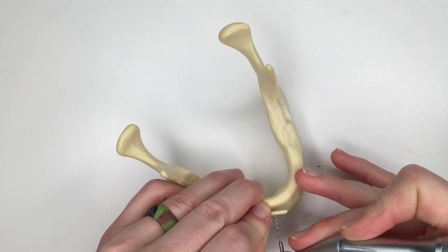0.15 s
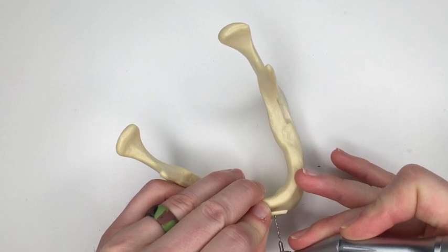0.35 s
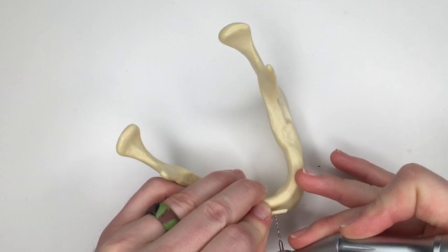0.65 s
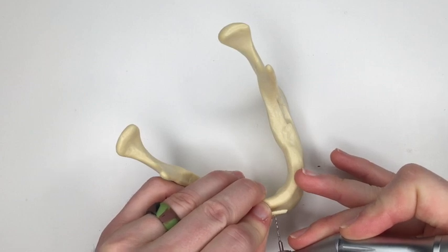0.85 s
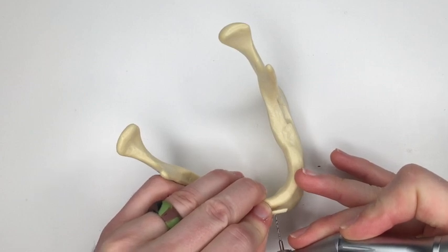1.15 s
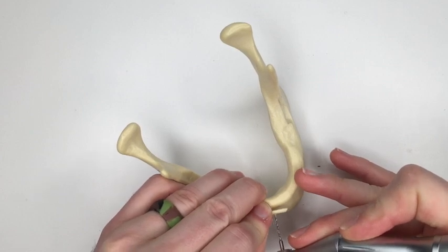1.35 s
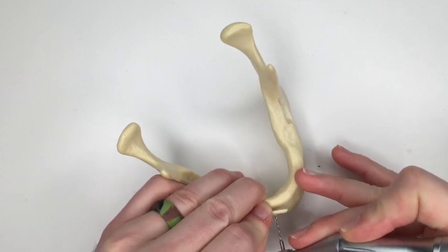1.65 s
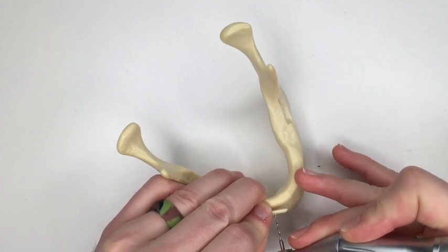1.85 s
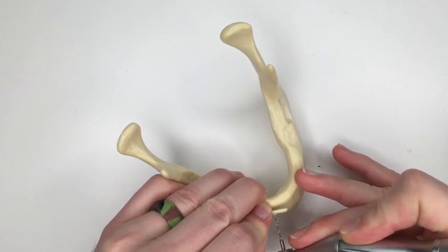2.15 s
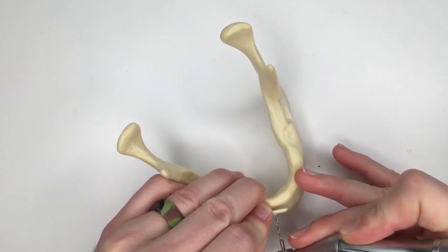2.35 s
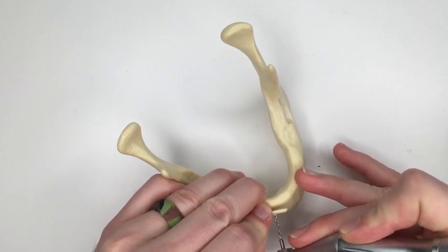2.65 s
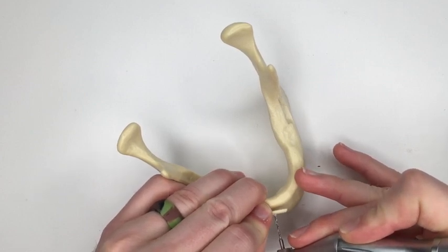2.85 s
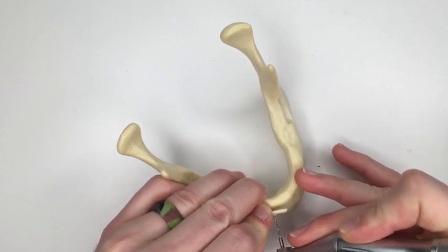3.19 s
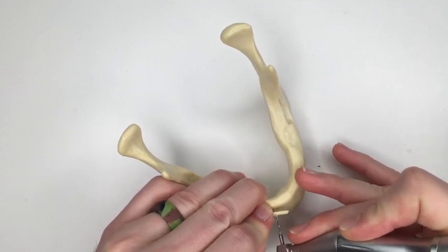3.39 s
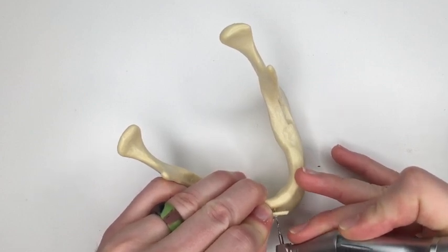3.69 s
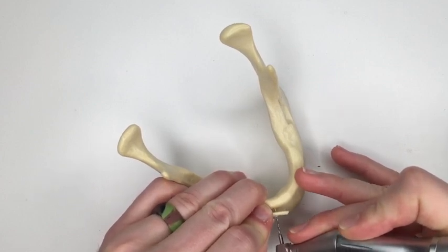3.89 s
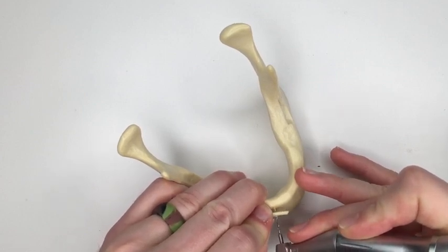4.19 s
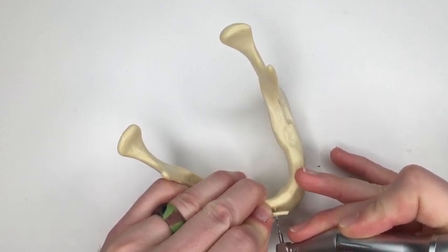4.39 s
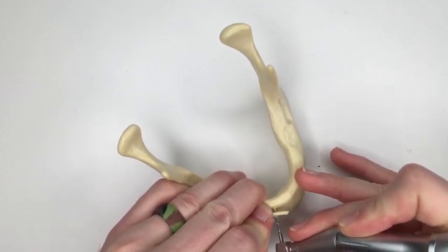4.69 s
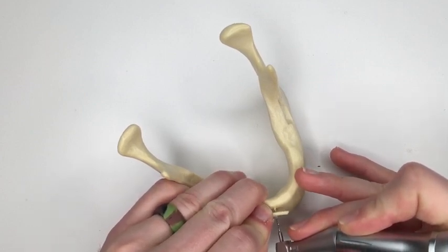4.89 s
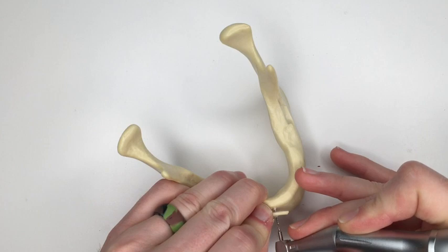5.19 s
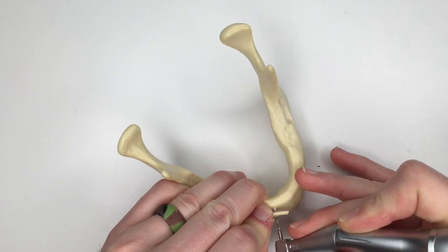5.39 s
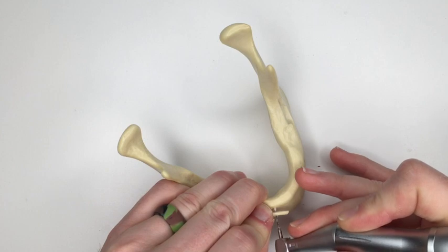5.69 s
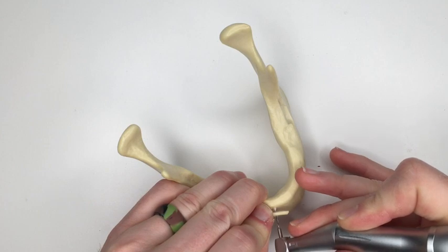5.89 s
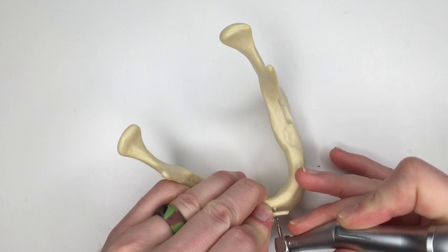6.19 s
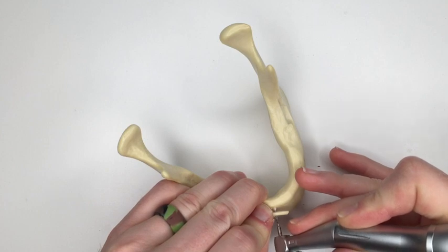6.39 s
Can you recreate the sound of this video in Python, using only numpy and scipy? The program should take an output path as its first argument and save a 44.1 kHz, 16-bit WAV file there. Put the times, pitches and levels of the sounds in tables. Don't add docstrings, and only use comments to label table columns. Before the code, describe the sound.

A faint room hum, then almost at once loose gear knocks and a fast rising whir. The drill briefly overspeeds, drops back, then climbs again with a bright, hissy steel rattle and rough pulsing. A thin plate buzzes as it is cut through; afterwards the tone smooths, with clearer high whine and a slight hollow plastic resonance. Dry, close, mono sound, still running at the cut-off.

```python
import sys
import numpy as np
from scipy import signal
from scipy.fft import rfft, irfft
from scipy.io import wavfile
from scipy.ndimage import uniform_filter1d

SR = 44100
rng = np.random.default_rng(int(sys.argv[2]) if len(sys.argv) > 2 else 0)


def dump(signal):
    limited = np.clip(np.atleast_2d(signal).T, -1, 1)
    pcm = np.round(limited * 32767).astype(np.int16)
    wavfile.write(sys.argv[1], SR, pcm)


def boost_factor(decibels):
    exponent = np.asarray(decibels, float) / 20
    return 10 ** exponent


N = 288414
T = np.arange(N) / SR
COARSE = T[::32]

# (frequency [Hz], level [dB per Hz])
HISS = [(180, -18), (300, -22), (354, -58), (500, 5), (590, -14.5), (922, -12), (1370, -5.5), (15500, -13)]
HISS_DB, RUMBLE_DB, TABLE_DB = -76.5, -77.5, -77.5
# (time [s], gain [dB], width [s])
DRONES = [
    (1.35, 3.5, 0.35),
    (2.3, 3, 0.29),
    (3.9, 1, 0.46),
]
# (time [s], gain [dB], width [s])
SHIFTS = [
    (2.3, 5.5, .25),
    (4.7, 3, .15),
    (5.5, 5, 0.21),
    (6.2, 6, 0.25),
]
# (time [s], peak level [dB], frequency [Hz])
BUMPS = [
    (3.357, -56, 406),
]

# (time [s], motor turns [Hz])
PEDAL = [(.055, 39.66), (.162, 118.7), (.282, 186.6), (.678, 194), (.86, 201.3), (.973, 212.5),
         (1.157, 217.8), (1.546, 222.8), (1.733, 228.4), (1.984, 221), (2.18, 226.4), (2.385, 237.3),
         (2.738, 246), (3.093, 253), (4.577, 256.5), (4.647, 259.5), (6.54, 258.9)]
# (time [s], gain [Hz], settling time [s])
PUSH = (1.543, 43, .095)
# (time [s], gain [Hz], width [s])
SURGES = [
    (.418, 59.5, .088),
    (1.31, -0.84, 0.053),
    (2.598, 9.5, 0.086),
    (3.26, 2, 0.14),
    (4.08, 1, .09),
    (5.048, 3.5, 0.096),
]
FULL_HZ = 300
# (time [s], depth [0-1])
DEPTH = [
    (3.3, 0.01),
    (3.6, .1),
    (4.3, 0.41),
    (4.7, .85),
    (4.92, 0.78),
    (5.08, 0.51),
    (5.3, 1.02),
    (6.54, 1.02),
]
TOUCH_S = [
    3.42,
    3.65,
]

# (time [s], rattle level [dB])
RATTLE = [(.052, -75), (.09, -60), (.22, -53), (.42, -48), (.58, -50), (1.0, -48.5), (1.4, -46.5),
          (1.98, -43), (2.36, -43), (2.66, -44.5), (2.94, -45), (3.1, -48), (3.73, -44.5), (4.3, -48),
          (4.65, -51.5), (4.95, -50), (5.9, -51), (6.54, -50)]
USUAL_DB = -47
# (time [s], level over the rattle [dB], length [s])
TAKE_UP = [
    (.054, 1, .006),
    (.061, 1, .001),
    (.0715, 5, .003),
    (.092, 0, .004),
    (.119, 0, .003),
    (.126, 0, .004),
    (.184, -2, .004),
    (.222, -2, .002),
    (.247, -1, .002),
]
FIRST_BITE_S = .0575
# (time [s], frequency [Hz], level [dB])
PULL_IN = [
    (.05, 2260, -51),
    (.12, 2150, -53.5),
    (.19, 2150, -50.5),
    (.25, 2500, -47),
    (.3, 3050, -50),
    (.34, 3440, -55),
    (.4, 3650, -86),
]
CARRIER_RATIO, BUR_RATIO, STAGE_RATIO = 1 / 4, 3 / 22, 12 / 11
# (swells per planet-carrier turn, height [dB])
CARRIER = [(1, 1.4), (2, -2.5), (3, 1.5), (5, 2.5), (6, 5.5)]
# (swells per bur turn, height [dB])
BUR = [(1, 2.1), (2, 0.27), (3, 0.15), (4, 0.72)]
LOOSE_BACKLASH, BACKLASH = 0.46, 0.88
REPEAT, DEEP_REPEAT = 0.31, 0.25

# (level in the plate [dB], gain deep in the jaw [dB])
ORDERS = [(-95, 7.5), (-96, 4.5), (-84.5, 12), (-78.5, 11), (-77, 4), (-81.5, -1.5), (-78, 0.5), (-76, 5.5),
          (-76.5, -2), (-77, 4), (-82, -7), (-77.5, 7), (-75.5, -2), (-75, -0.5), (-70.5, -1.5), (-76, -2),
          (-72.5, 1), (-73.5, 0.5), (-79, 9.5), (-86, 3), (-105, 2), (-80, -23), (-73, -14), (-78.5, 12),
          (-77, 9), (-71, 9.5), (-65, 3.5), (-77, 6)]
WHINE_DB_PER_OCTAVE = 16
# (multiple of its turns, level [dB])
STAGE = [(2, -91.5), (3, -91.5), (5, -91), (7, -87.5), (9, -81.5), (10, -83)]
# (multiple of motor turns, level [dB])
TOP_ORDERS = [(26.75, -69), (33, -67), (36, -67), (39.25, -68), (43.75, -66), (44, -63), (44.25, -64)]
# (frequency [Hz], half width [Hz], lift [dB])
BODY = [(540, 219, 14), (1175, 80, 2), (2133, 114, 10), (2930, 300, 9), (3635, 166, 6.5), (3910, 60, 7),
        (4765, 110, 7.5), (5560, 194, 11), (7773, 280, 6)]
# (time [s], gain [dB], width [s])
RUN_FREE = [
    (.43, 3.5, 0.087),
]

# (frequency [Hz], width [Hz], level [dB])
BARREL = [(9755, 780, -2.5), (10610, 740, 0), (11320, 390, -9)]
# (frequency [Hz], width [Hz], level [dB])
CAP = [(11420, 200, -10), (11740, 160, 2.5), (12120, 130, -2.5)]
# (frequency [Hz], width [Hz], level [dB])
NECK = [(12100, 170, -11), (13150, 380, -5.5), (13620, 350, -2), (13760, 1400, -7.5), (15800, 900, -12)]
# (frequency [Hz], width [Hz], level [dB])
SHELL = [(6450, 230, -5), (7000, 370, 2.5), (7510, 460, 4.5), (8170, 450, 4), (8460, 230, 3)]
# (frequency [Hz], width [Hz], level [dB])
BETWEEN = [(5050, 530, -12.5), (9020, 420, -7), (11930, 150, -6), (12700, 380, 2), (14450, 600, -4)]
BETWEEN_DB = -2
# (frequency [Hz], width [Hz], level [dB])
PLATE = [(2150, 320, -8.5), (2657, 420, -10), (3030, 610, -1), (3723, 460, 0.5)]
# (frequency [Hz], width [Hz], level [dB])
FLUTES = [(4343, 870, -1), (4920, 640, -5.5), (5390, 320, -4), (6126, 620, 1.5)]
# (frequency [Hz], width [Hz], level [dB])
JAW = [(484, 180, -6), (1050, 307, 2.5), (1306, 103, -4), (1707.5, 690, 6.5)]
# (level at usual rattle and full speed [dB], share of the rattle's swings [0-1],
# slope [dB per octave of speed], gain on touching the jaw [dB], gain at full depth [dB])
PARTS = [
    (-47, 0.92, 3, 1, -0.5),
    (-53, 0.71, -3, 1.5, -5.5),
    (-51, 0.99, -1, -0.5, 5.5),
    (-53, 0.77, 0, 0, 2.5),
    (-65, 0.41, -3, 2.5, 3.5),
    (-59.5, 0.53, -1.5, .5, 1.5),
    (-75, 0.24, 0.5, 5.5, 2.5),
]
# (time [s], gain [dB], width [s])
CHATTER = [
    (2.75, 13.5, 0.23),
    (3.6, 13, 0.19),
    (4.1, 7.3, 0.14),
]
# (frequency [Hz], width [Hz], level [dB])
CHATTER_NOTE = [(5365, 110, -4), (5830, 250, -0.5)]
CHATTER_DB = -71


def unit(x):
    return x / np.sqrt(np.mean(x ** 2))


def curves(table):
    s, *columns = np.transpose(table)
    return [np.interp(T, s, c) for c in columns]


def swells(rows):
    return sum(height * np.exp(-.5 * ((T - s) / width) ** 2) for s, height, width in rows)


def fine(slow):
    return np.interp(T, COARSE, slow)


def drift(rate):
    k = max(int(SR / 32 / rate), 1)
    held = np.repeat(rng.standard_normal(len(COARSE) // k + 1), k)[:len(COARSE)]
    return 1.3 * uniform_filter1d(uniform_filter1d(held, k), k)


def walk(rate):
    return fine(drift(rate))


def ring(x, modes, wander_db=0.):
    out = 0
    for k, (hz, width, db) in enumerate(modes):
        b, a = signal.iirpeak(hz, hz / (1.46 * width), SR)
        gain = fine(boost_factor(db + wander_db * (drift(2.12) + drift(9)))) / np.sqrt(width)
        rung = signal.lfilter(b, a, signal.lfilter(b, a, x))
        out = out + (-1) ** k * gain * rung
    return unit(out)


def hiss():
    f = np.fft.rfftfreq(N, 1 / SR) + 1
    hz, db = np.transpose(HISS)
    tilt = boost_factor(np.interp(np.log(f), np.log(hz), db))
    return boost_factor(HISS_DB) * unit(irfft(rfft(rng.standard_normal(N)) * tilt, N))


def bumps():
    out = 0
    for s, db, hz in BUMPS:
        age = np.maximum(T - s, 0)
        out = out + boost_factor(db) * np.exp(-age / 0.0021) * np.sin(2 * np.pi * hz * age)
    return out


def room():
    rumble = ring(rng.standard_normal(N), [(29.3, 22, -2.3), (57, 13.8, 0.69), (65.2, 17.0, -0.27)])
    table = ring(rng.standard_normal(N),
                 [(105.8, 21.4, -3.0), (200.3, 133, 0.5), (349, 43, -2.0), (556, 310, -2.5)])
    out = boost_factor(RUMBLE_DB + swells(DRONES)) * rumble
    out = out + boost_factor(TABLE_DB + swells(SHIFTS)) * table
    return out + hiss() + bumps()


def speed():
    s, gain_hz, settle = PUSH
    push = gain_hz * (1 - np.exp(-np.maximum(T - s, 0) / settle))
    return curves(PEDAL)[0] + push + swells(SURGES)


def pull_in(turn, age):
    ring_hz, db = curves(PULL_IN)
    pitch, level = rng.standard_normal((turn[-1] + 1, 2))[turn].T
    envelope = (1 - np.exp(-age / .0003)) * np.exp(-age / .001)
    bite = envelope * np.sin(2 * np.pi * ring_hz * (1 + .04 * pitch) * age)
    return boost_factor(db + 1.7 * level) * bite


def whine(turns, hz, depth):
    out = 0
    hz, depth, free_db = hz[::32], depth[::32], swells(RUN_FREE)[::32]
    loose = np.interp(COARSE, [4, 5.3], [1, .4])
    shaft = turns + fine(.0045 * loose * drift(70))

    def tone(k, gain):
        return fine(gain) * np.sin(2 * np.pi * (k * shaft + rng.random()))

    speed_db = WHINE_DB_PER_OCTAVE * np.log2(hz / FULL_HZ)
    for k, (db, deep_db) in enumerate(ORDERS, start=1):
        db = db + speed_db + deep_db * depth
        db = db + free_db * (6 < k < 16)
        db = db + sum(lift / (1 + ((k * hz - f) / w) ** 2) for f, w, lift in BODY)
        flutter_db = loose * (1 + k / 20) * drift(14)
        out = out + tone(k, boost_factor(db + flutter_db))
    loaded = np.interp(hz, [270, 298], [.2, 1])
    for k, db in STAGE:
        out = out + tone(k * STAGE_RATIO, loaded * boost_factor(db + 11.6 * depth))
    for k, db in TOP_ORDERS:
        out = out + tone(k, loaded ** 2 * boost_factor(db + 1.6 * drift(6.6)))
    engaged_db = np.interp(T, [.26, .4], [-22, -1])
    return np.sqrt(2) * boost_factor(engaged_db) * out


def worn(turns, count):
    wear = rng.standard_normal(count)
    return unit(np.interp(turns % 1 * count, np.arange(count + 1), np.append(wear, wear[0])))


def teeth(turns, backlash, repeat):
    share = np.clip(repeat, 0, .95)
    same = worn(turns * CARRIER_RATIO, count=800)
    hits = np.sqrt(share) * same + np.sqrt(1 - share) * rng.standard_normal(N)
    swell = 0.77 * walk(300) + 0.41 * walk(35) + 0.13 * walk(8.6)
    seated = np.interp(T, [2.6, 4.6], [1, .45])
    for ratio, spots in ((CARRIER_RATIO, CARRIER), (BUR_RATIO, BUR)):
        for k, db in spots:
            height = db * seated * (1 + 0.14 * walk(4.9))
            swell = swell + height * np.cos(2 * np.pi * (k * ratio * turns + rng.random()))
    gate = boost_factor(7.4 * np.tanh(np.clip(backlash, 0, 2) * swell / 6))
    return hits * gate / np.sqrt(uniform_filter1d(gate ** 2, SR // 4))


def slack(age):
    tight = np.interp(T, [.11, .3], [.25, 1])
    gain = tight + 1.3 * (1 - tight) * np.exp(-age / 0.0052)
    for s, db, length in TAKE_UP:
        gain = gain + boost_factor(db) * np.exp(-np.abs(T - s) / length) * (T > s)
    return gain


def levels(hz, depth):
    swing_db = curves(RATTLE)[0] - USUAL_DB
    octaves = np.log2(np.maximum(hz, 190) / FULL_HZ)
    touch = np.interp(T, TOUCH_S, [0, 1])
    silent_db = np.minimum(swing_db + 11, 0)
    return [db + share * (swing_db - silent_db) + silent_db + slope * octaves + on_touch * touch + deep * depth
            for db, share, slope, on_touch, deep in PARTS]


def housing(hits, elsewhere, turns, hz, part_db):
    barrel_db, cap_db, neck_db, shell_db = part_db
    bright = hits + boost_factor(-8) * worn(turns, count=200)
    out = boost_factor(barrel_db) * ring(bright, BARREL, wander_db=1.0)
    out = out + boost_factor(cap_db) * ring(bright, CAP, wander_db=0.4)
    out = out - boost_factor(neck_db) * ring(bright, NECK, wander_db=0.3)
    out = out - boost_factor(shell_db) * ring(hits, SHELL, wander_db=-0.77)
    between_db = neck_db + BETWEEN_DB - 5 * np.log2(hz / FULL_HZ)
    out = out + boost_factor(between_db) * ring(elsewhere, BETWEEN, wander_db=0.8)
    chatter = boost_factor(CHATTER_DB + swells(CHATTER)) * (T > .3)
    return out + chatter * ring(bright, CHATTER_NOTE, wander_db=1.5)


def cut(hits, elsewhere, part_db):
    plate_db, flutes_db, jaw_db = part_db
    out = boost_factor(plate_db) * ring(hits, PLATE, wander_db=0.3)
    out = out + boost_factor(flutes_db) * ring(hits, FLUTES, wander_db=0.3)
    out = out + boost_factor(jaw_db) * ring(elsewhere, JAW, wander_db=0.3)
    return boost_factor(np.interp(T, [.2, .35], [-4, 0])) * out


def handpiece():
    hz, depth = speed(), curves(DEPTH)[0]
    part_db = levels(hz, depth)
    turns = np.cumsum(hz * (T > FIRST_BITE_S)) / SR
    age = turns % 1 / hz
    backlash = np.interp(T, [.22, .4], [LOOSE_BACKLASH, BACKLASH])
    repeat = REPEAT + (DEEP_REPEAT - REPEAT) * depth
    hits = teeth(turns, backlash, repeat) * slack(age)
    elsewhere = hits * np.sign(rng.standard_normal(N))
    out = housing(hits, elsewhere, turns, hz, part_db[:4]) + cut(hits, elsewhere, part_db[4:])
    out = out + whine(turns, hz, depth) + pull_in(turns.astype(int), age)
    return out * np.clip((T - TAKE_UP[0][0]) / .004, 0, 1)


def scene():
    return np.tile(room() + handpiece(), (2, 1))


def low_pass(x):
    return signal.sosfilt(signal.butter(12, 15700, fs=SR, output="sos"), x)


def record(dry):
    return low_pass(dry)


dry = scene()
out = record(dry)
dump(out)
```